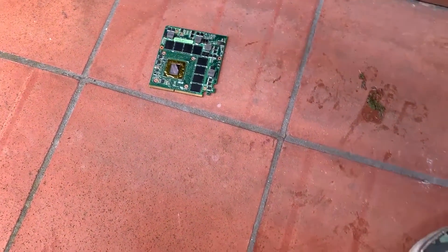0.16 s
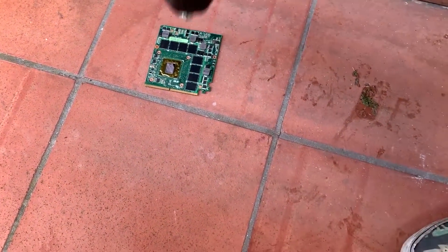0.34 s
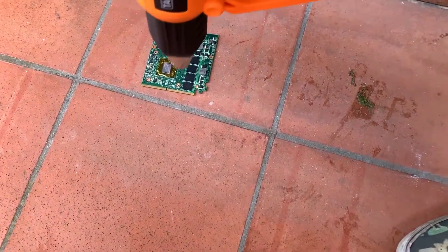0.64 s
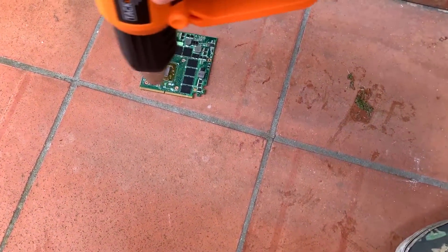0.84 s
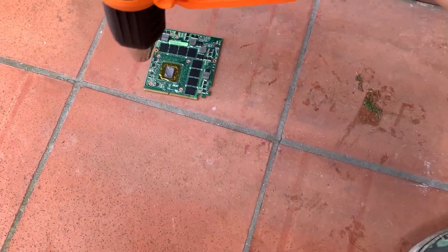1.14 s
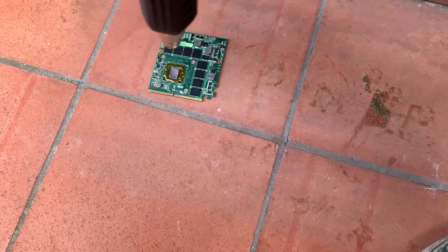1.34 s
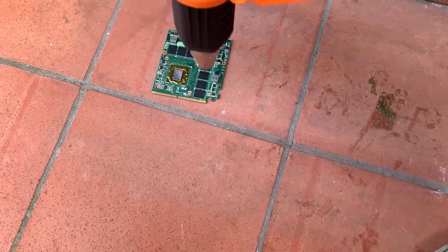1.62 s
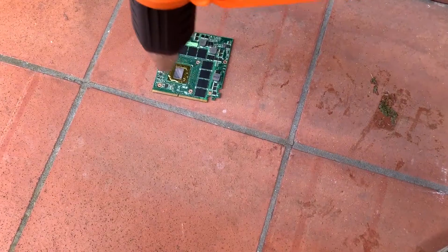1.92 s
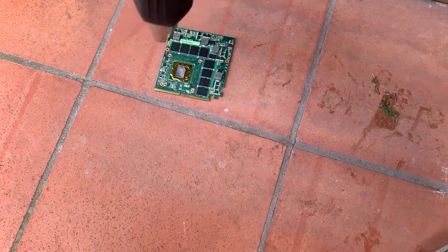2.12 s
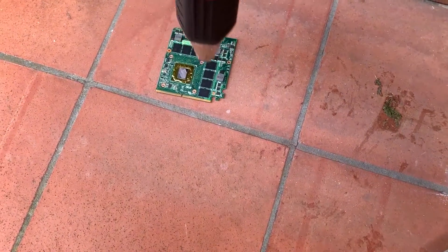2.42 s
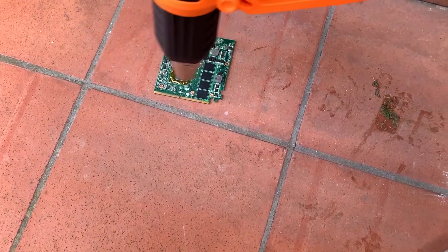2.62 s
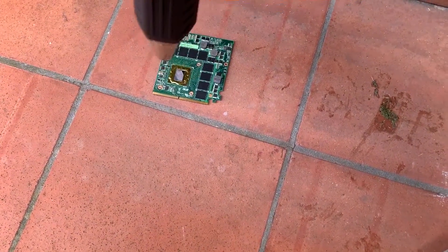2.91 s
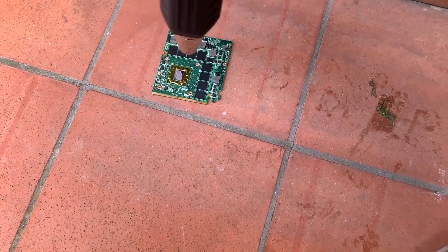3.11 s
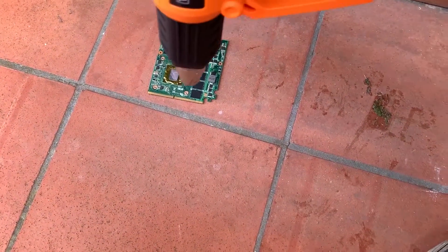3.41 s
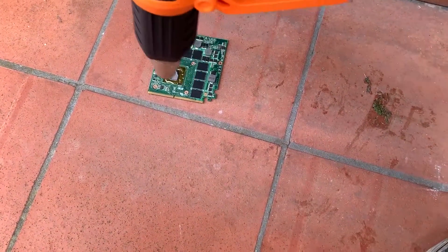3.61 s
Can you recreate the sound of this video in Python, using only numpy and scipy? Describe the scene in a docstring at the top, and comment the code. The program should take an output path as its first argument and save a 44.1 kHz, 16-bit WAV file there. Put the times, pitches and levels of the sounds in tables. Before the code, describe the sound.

An electric heat gun roars and hisses steadily close by, with one brief low wind buffet.

```python
"""A roaring barrel and a hissing nozzle come first: an electric heat gun, close to a phone,
is brought down over a circuit board on a tiled floor and circles it. The air is coloured noise in flickering layers.
The jet splashes on the tiles (one broad band of noise); narrow bands of noise give a faint blade whine, a whistle
and peaks coloured by nearby reflections. Once a gust of air buffets the microphone ports: low noise with a few
sharp flaps. A little room sound surrounds the gun."""
import sys
import numpy as np
from scipy import signal
from scipy.fft import rfft, irfft
from scipy.io import wavfile
from scipy.ndimage import uniform_filter1d

SR = 44100
rng = np.random.default_rng(int(sys.argv[2]) if len(sys.argv) > 2 else 0)


def natural_amplitude(level_db):
    """Convert a level in decibels to a linear amplitude factor, elementwise."""
    exponent = np.asarray(level_db, float) / 20
    return 10 ** exponent


def to_wav(sig):
    """Store sig (one row per channel, or 1-D mono) as 16-bit WAV at the path in sys.argv[1].

    Samples outside -1..1 are clipped; the rate is SR.
    """
    pcm = np.clip(np.atleast_2d(sig), -1, 1) * 32767
    pcm = np.round(pcm).astype(np.int16)
    wavfile.write(sys.argv[1], SR, pcm.T)  # frames by channels


N = 165375  # length in samples

# How loud each part of the gun is as it moves:
# [t/s, barrel roar level/dB, jet hiss level/dB, deep rumble level/dB, housing hum level/dB, tile splash level/dB]
GUN_LEVELS = [(0, -35, -39, -40.5, -47, -43), (.1, -33.5, -35.5, -40.5, -46, -59),
              (.3, -30, -35, -41, -48, -44), (.45, -32, -31, -40, -41, -43),
              (.7, -34, -30, -39, -40.5, -35.5), (.93, -33.5, -29.5, -44, -45, -38),
              (1.0, -35, -30, -41, -50, -33), (1.3, -31.5, -29.5, -44.5, -47.5, -34),
              (1.76, -32, -29, -43.5, -44.5, -29), (1.84, -31.5, -29.5, -41.5, -39, -45),
              (2.3, -31, -29, -41.5, -39.5, -52), (2.8, -30.5, -27.5, -41, -38, -58),
              (3.2, -31, -28, -38.5, -39, -37), (3.75, -30, -28.5, -38, -38.5, -47)]
# Colour of the whole airflow, before each layer is set to its own level: [f/Hz, level per Hz/dB]
AIRFLOW_COLOUR = [(25, -80), (55, -57.3), (110, -62), (190, -67), (290, -60.5), (420, -70.5), (620, -65),
                  (900, -61), (1020, -57.2), (1200, -65), (1480, -67), (2000, -67), (2450, -70),
                  (2900, -70), (3400, -72), (4400, -71), (5000, -70), (5950, -75), (6350, -69), (6900, -72),
                  (8400, -71), (10200, -71), (11000, -70), (12000, -67.5), (13100, -71), (14500, -73),
                  (15600, -76)]
# Narrow bands of noise: a blade whine near 1640 Hz, a whistle near 5430 Hz, and peaks coloured by
# nearby reflections: [f/Hz, width/Hz, level/dB, start t/s, end t/s]
NARROW_BANDS = [(820, 90, -41, .95, 4.5), (1090, 120, -39, 0, 1.8), (1330, 150, -44, 0, 4.5),
                (1635, 40, -43, 1.85, 2.7), (1642, 40, -39.5, 2.7, 4.5), (1700, 250, -40, .95, 1.8),
                (1800, 200, -45, 0, .9), (2080, 150, -41, 0, .5), (2280, 120, -42, .75, 1.5),
                (2230, 200, -43, 1.85, 4.5), (2650, 150, -44, 1.2, 4.5), (3070, 200, -43, 1.0, 4.5),
                (3400, 170, -43, 0, 1.8), (3880, 250, -44, 1.85, 4.5), (4850, 150, -45, .45, 1.6),
                (5430, 220, -44, .1, 1.0), (5430, 280, -39.5, 1.0, 4.5), (6350, 250, -46, 1.0, 4.5),
                (7300, 350, -42, .9, 2.7), (8000, 250, -44, 1.8, 4.5), (9300, 400, -43, 1.6, 4.5),
                (10610, 250, -44, 1.8, 4.5), (11400, 500, -43, 1.0, 1.9), (12000, 350, -45, .4, 4.5),
                (12720, 200, -45, .4, 4.5), (13600, 300, -47, 1.8, 4.5), (14300, 300, -49, .1, 1.8)]
# Loudness of the gust on the microphone, near silence outside these times: [t/s, level/dB]
GUST_LEVELS = [(.714, -45), (.728, -23), (.766, -21), (.786, -24), (.826, -20), (.854, -24), (.878, -21),
               (.908, -22), (.95, -21), (.96, -31), (.985, -42)]
# Colour of the gust, before its level is set: [f/Hz, level per Hz/dB]
GUST_COLOUR = [(20, -55), (45, -11), (80, -1.5), (150, -4), (270, -11.5), (450, -20.5), (650, -22),
               (1000, -54)]
# Sharp flaps of pressure within the gust: [t/s, peak level/dB]
FLAPS = [(0.728, -12.5), (.764, -13), (.811, -17), (.826, -16), (.837, -13.5), (.878, -10), (.901, -11),
         (.934, -20), (0.952, -12)]
# How far the right channel runs ahead of the left for the gun: [f/Hz, phase/rad]
GUN_LEAD = [(30, .06), (260, .2), (650, .33), (1100, .03), (1750, 0), (2100, -.75), (2750, -1.1),
            (3300, -1.7), (3900, -1.9), (4700, -3.14), (6850, -6.28), (8950, -9.42), (11100, -12.57),
            (13250, -15.71), (15500, -18.85)]
# The same for the gust: [f/Hz, phase/rad]
GUST_LEAD = [(30, .3), (170, 0.52), (300, 1.18), (500, 1.26), (900, 0.75)]
# Room sound compared with the gun itself: [f/Hz, level/dB]
ROOM_COLOUR = [(60, -32), (400, -14), (1200, -14.5), (2200, -16.5), (3300, -28), (4500, -18), (15000, -24)]


def heat_gun():
    """The moving gun: airflow parts and splash follow their own levels; the narrow bands join them."""
    parts = airflow() + [tile_splash()]
    sound = narrow_bands()
    for column, part in enumerate(parts, start=1):
        sound = sound + unit(part) * natural_amplitude(gun_level(column))
    return sound


def airflow():
    """Rough air gives noise; one shared colour is split by pitch into roar, jet hiss, rumble and hum."""
    rumble_top_hz, hum_top_hz, hiss_from_hz = 146, 437, 3140
    rumble = air_layer(lambda hz: share_below(hz, rumble_top_hz))
    hum = air_layer(lambda hz: share_below(hz, hum_top_hz) - share_below(hz, rumble_top_hz))
    roar = air_layer(lambda hz: share_below(hz, hiss_from_hz) - share_below(hz, hum_top_hz))
    jet = np.zeros(N)
    for centre_hz in 700 * 2 ** (np.arange(10) / 2):  # half-octave steps, each band flickers alone
        jet = jet + air_layer(lambda hz: (1 - share_below(hz, hiss_from_hz)) * band_share(hz, centre_hz))
    return [roar, jet, rumble, hum]


def air_layer(share):
    """Noise holding a share of the airflow's power, with a level that flickers at random."""
    flicker_db, flicker_per_s = .5, 12  # typical size before smoothing, new levels each second
    noise = hiss(lambda hz: natural_amplitude(along(AIRFLOW_COLOUR, hz)) * np.sqrt(share(hz)))
    return noise * natural_amplitude(flicker_db * walk(flicker_per_s))


def share_below(hz, corner_hz):
    """The share of power below a corner: nearly all well below it, half at it, little above it."""
    return 1 / (1 + (hz / corner_hz) ** 6)


def band_share(hz, centre_hz):
    """A triangle of power that fades to nothing half an octave either side of its centre."""
    octaves_away = abs(np.log2((hz + 1) / centre_hz))
    return np.clip(1 - 2 * octaves_away, 0, 1)


def tile_splash():
    """The jet breaking up on the tiles: noise through two equal, broad resonances."""
    centre_hz, width_hz = 2510, 2700  # width of each resonance
    return hiss(lambda hz: peak(hz, centre_hz, width_hz) ** 2)


def narrow_bands():
    """Whine, whistle and reflection peaks: noise squeezed through narrow resonances."""
    total = np.zeros(N)
    for centre_hz, width_hz, level_db, start_s, end_s in NARROW_BANDS:
        band = unit(hiss(lambda hz: peak(hz, centre_hz, width_hz) ** 2))
        total = total + band * natural_amplitude(level_db) * (swell(start_s) - swell(end_s))
    return total


def swell(middle_s):
    """A smooth rise from 0 to 1, halfway up at the given time."""
    rise_s = 0.02  # time scale of the S-shaped rise
    return 1 / (1 + np.exp((middle_s - np.arange(N) / SR) / rise_s))


def gun_level(column):
    """One level column of the gun's movement, in dB for every sample."""
    rows = np.array(GUN_LEVELS, float)
    return np.interp(np.arange(N) / SR, rows[:, 0], rows[:, column])


def gust():
    """Air buffeting the microphone: low, rough pressure noise plus a few sharp flaps."""
    rows = np.array(GUST_LEVELS, float)
    level_db = np.interp(np.arange(N) / SR, rows[:, 0], rows[:, 1], left=-120, right=-120)
    rough_air = hiss(lambda hz: natural_amplitude(along(GUST_COLOUR, hz)) * (hz < 1200))
    return unit(rough_air) * natural_amplitude(level_db) + flaps()


def flaps():
    """Each flap is a click that briefly rings through three equal, heavily damped resonances."""
    clicks = np.zeros(N)
    for time_s, peak_db in FLAPS:
        clicks[int(time_s * SR)] = natural_amplitude(peak_db)
    ring = lambda hz: peak(hz, 280, 650) ** 3  # centre and width of each resonance in Hz
    single_peak = np.abs(shaped(np.arange(N) == 0, ring)).max()  # so each ring peaks at its click's level
    return shaped(clicks, ring) / single_peak


def room_sound(gun):
    """The room returns a quieter, coloured, late copy of the gun, upside down in the right channel."""
    late_s = .04
    late_copy = shaped(gun, lambda hz: natural_amplitude(along(ROOM_COLOUR, hz)) * np.exp(-2j * np.pi * hz * late_s))
    return late_copy * np.array([[1], [-1]])


def ports(x, lead):
    """Two microphone channels hear x with a phase difference that depends on pitch."""
    return np.array([shaped(x, lambda hz: np.exp(side * .5j * along(lead, hz))) for side in (-1, 1)])


def along(table, hz):
    """Reads a table of pitch and value, with pitch on a log scale as in hearing."""
    rows = np.array(table, float)
    return np.interp(np.log(hz + 1), np.log(rows[:, 0]), rows[:, 1])


def shaped(x, response):
    """Filters x: each pitch is multiplied by the response there."""
    return irfft(rfft(x) * response(np.arange(N // 2 + 1) * SR / N), N)


def unit(x):
    """Scales x to an average (rms) level of 1."""
    return x / np.sqrt(np.mean(x ** 2))


def hiss(response):
    """Fresh noise of the given colour."""
    return shaped(rng.standard_normal(N), response)


def peak(hz, centre_hz, width_hz):
    """A resonance: strongest, with gain 1, at its centre."""
    return 1 / (1 + 2j * (hz - centre_hz) / width_hz)


def walk(rate):
    """Random levels, so many each second, smoothed twice so they glide."""
    hold = int(SR / rate)  # samples per level
    steps = np.repeat(rng.standard_normal(N // hold + 1), hold)
    return uniform_filter1d(uniform_filter1d(steps, hold), hold)[:N]


def scene():
    """The gun, the gust and the room sound together in two channels."""
    gun = heat_gun()
    return ports(gun, GUN_LEAD) + ports(gust(), GUST_LEAD) + room_sound(gun)


def top_cut(x):
    """Nothing passes above the cut-off."""
    return signal.sosfilt(signal.butter(12, 16750, fs=SR, output="sos"), x)


def record(dry):
    """The phone cuts off the highest treble."""
    top_hz = 15750
    mix = np.array([shaped(x, lambda hz: hz < top_hz) for x in dry])
    return top_cut(mix)


dry = scene()
out = record(dry)
to_wav(out)
```